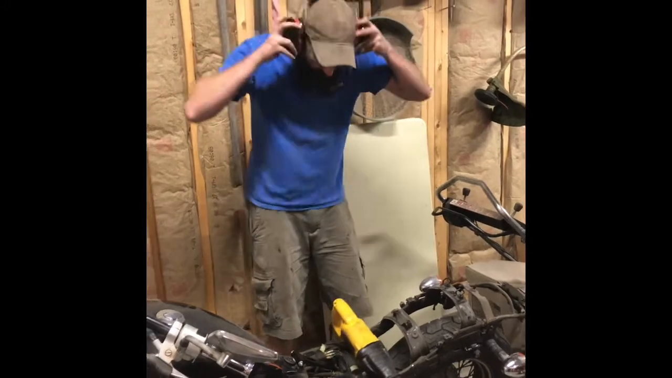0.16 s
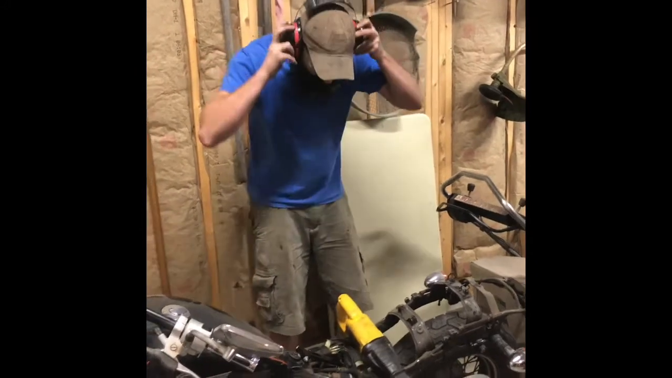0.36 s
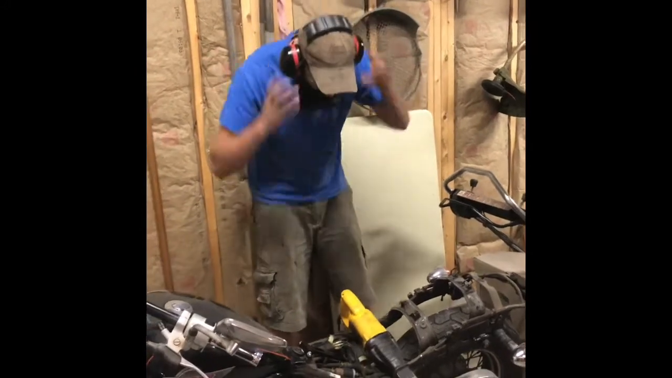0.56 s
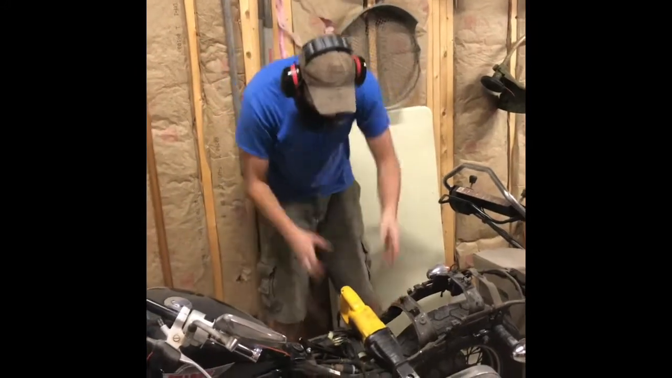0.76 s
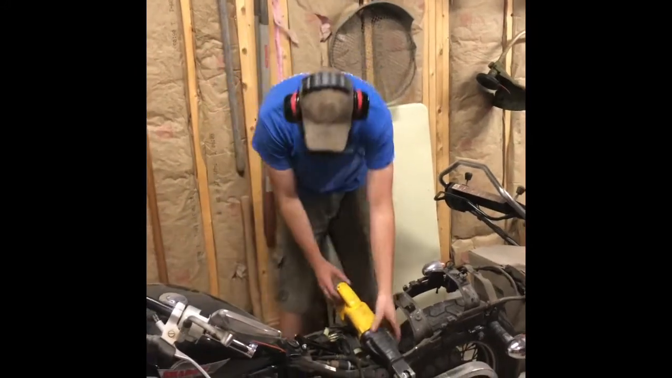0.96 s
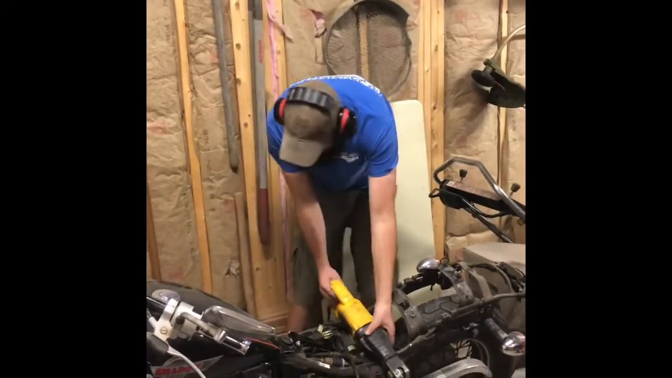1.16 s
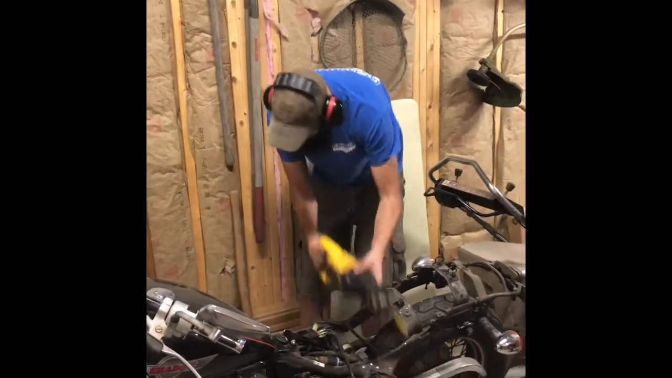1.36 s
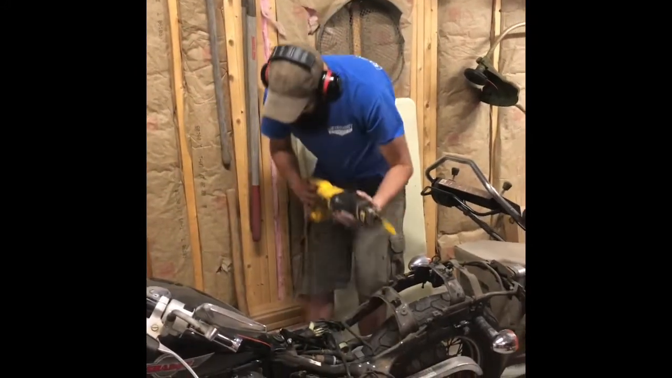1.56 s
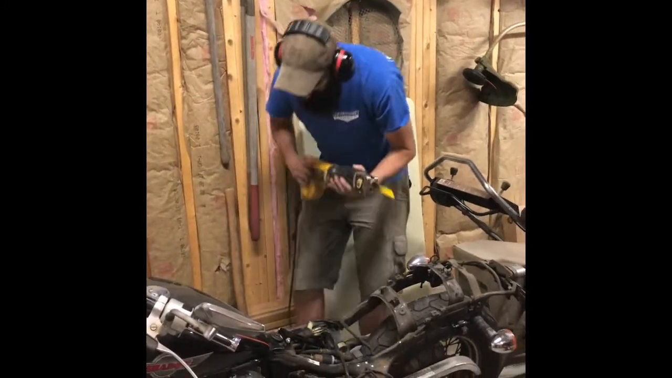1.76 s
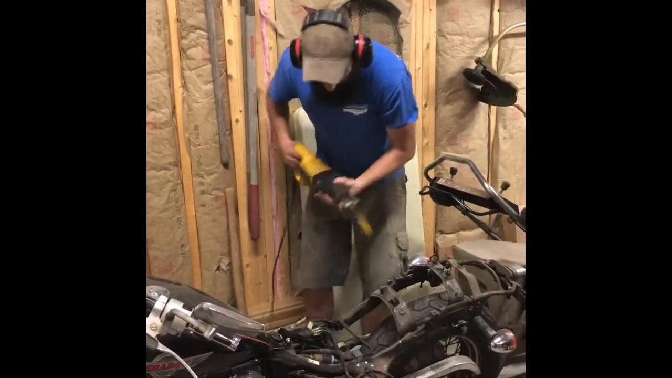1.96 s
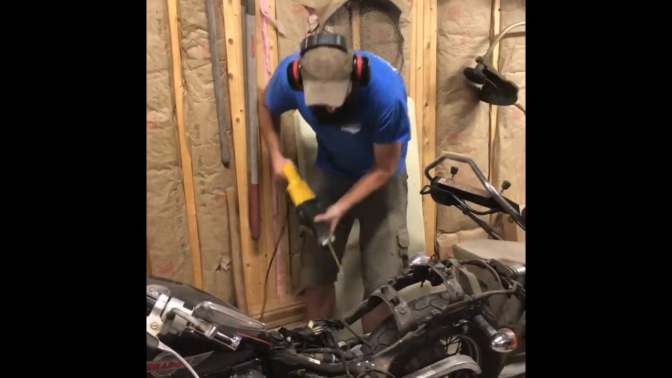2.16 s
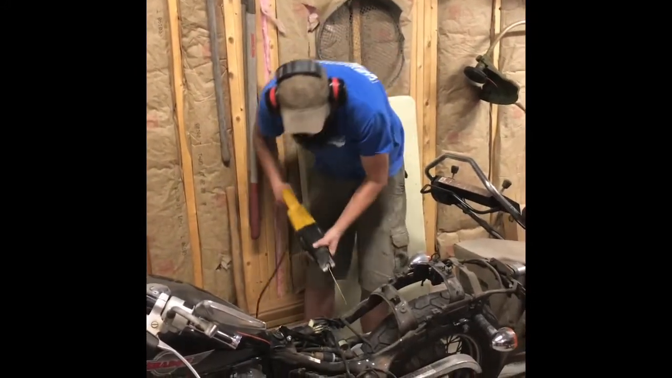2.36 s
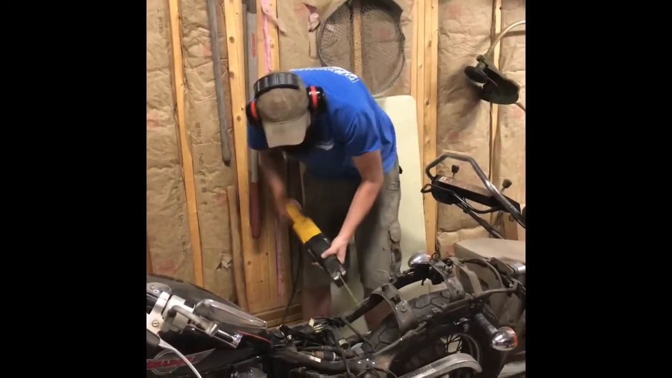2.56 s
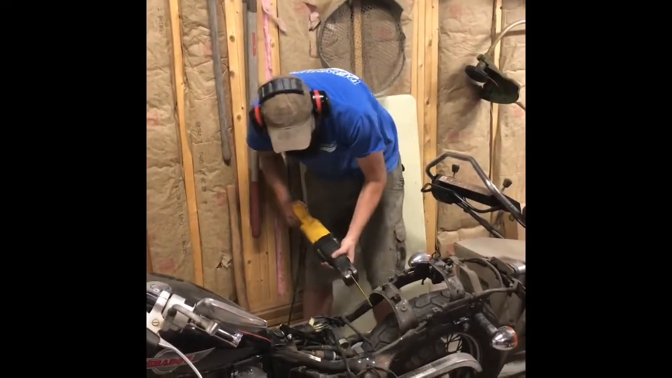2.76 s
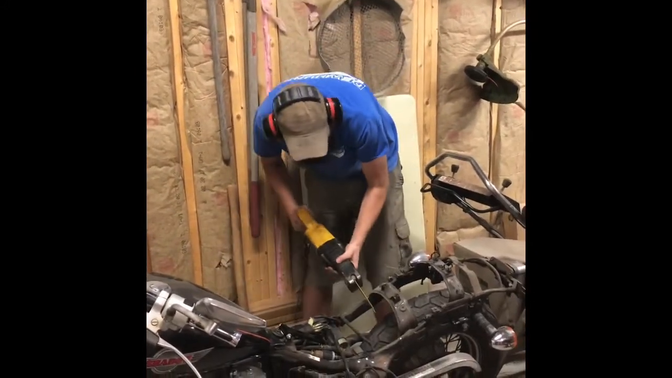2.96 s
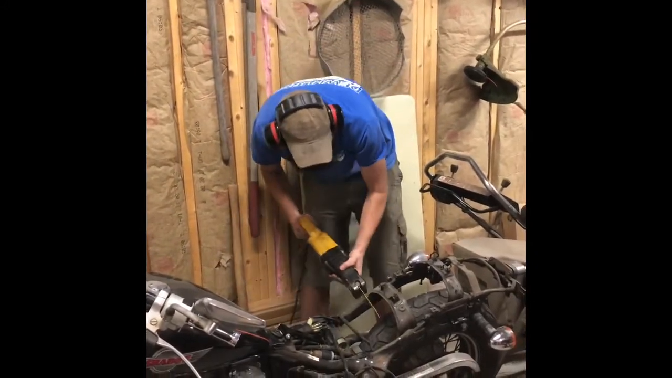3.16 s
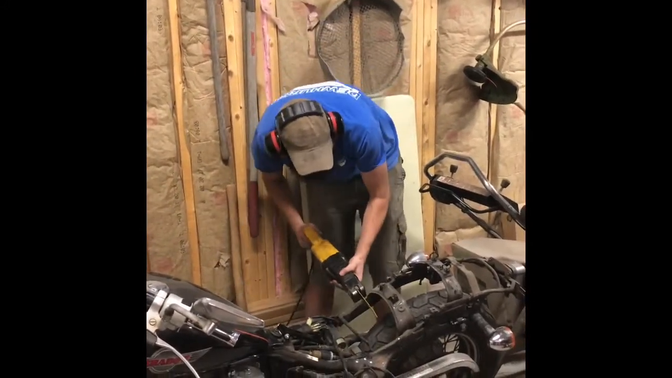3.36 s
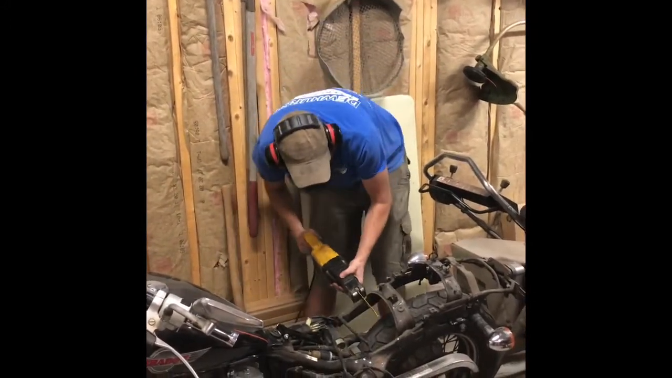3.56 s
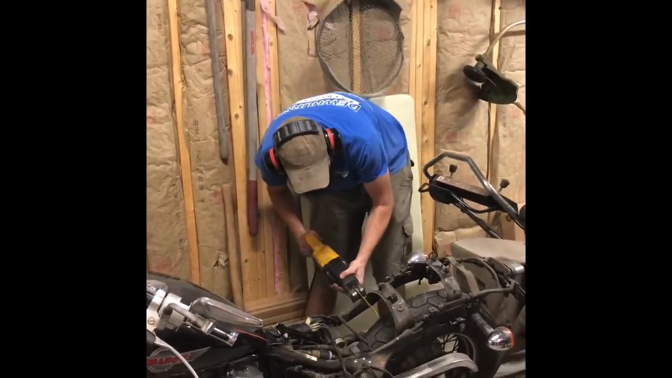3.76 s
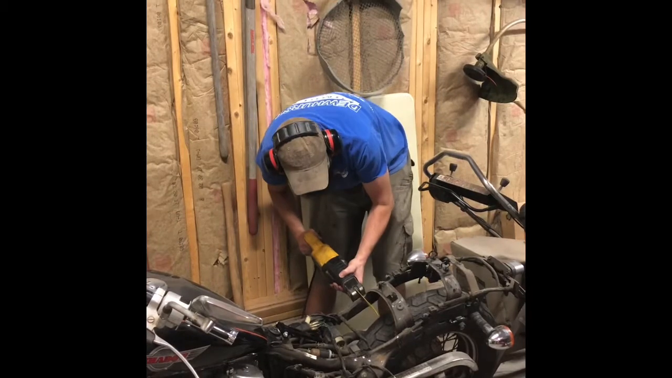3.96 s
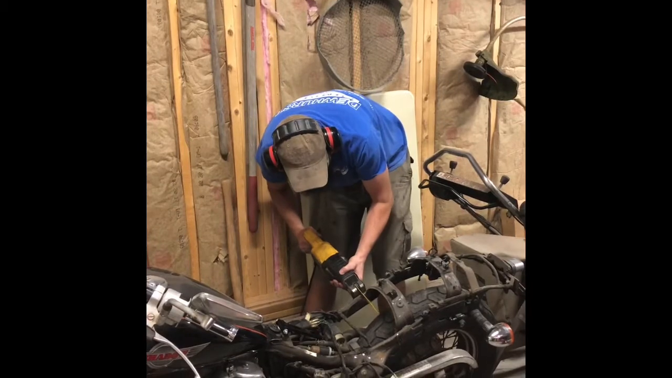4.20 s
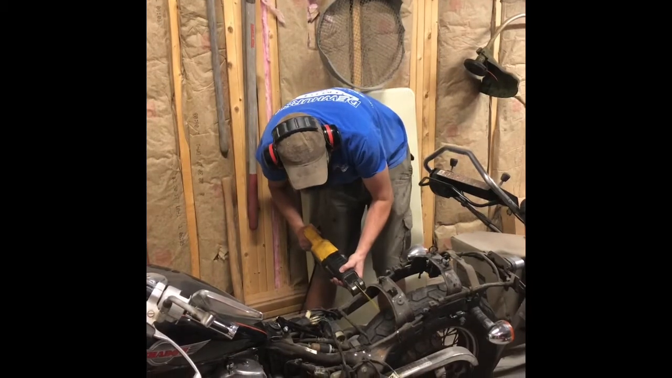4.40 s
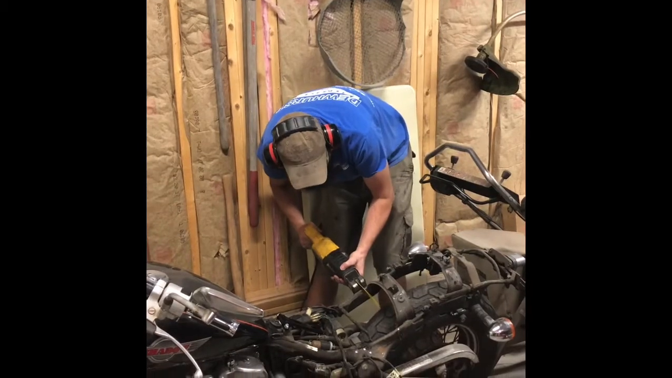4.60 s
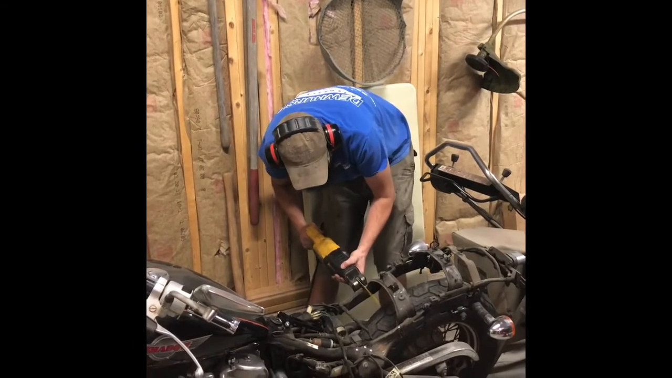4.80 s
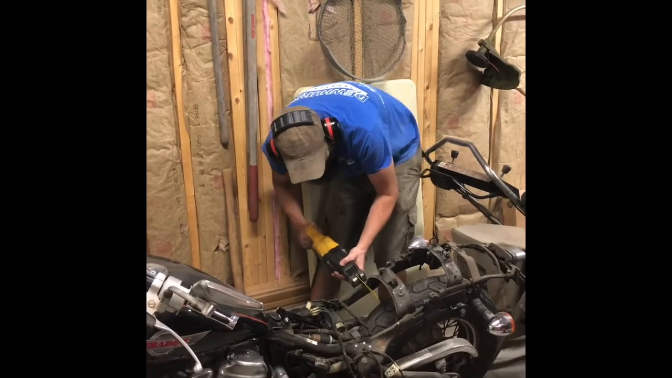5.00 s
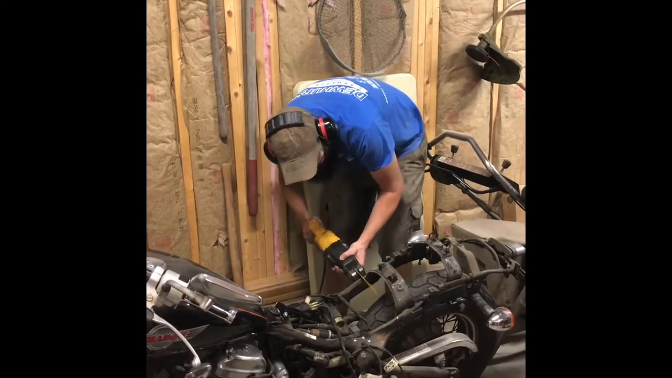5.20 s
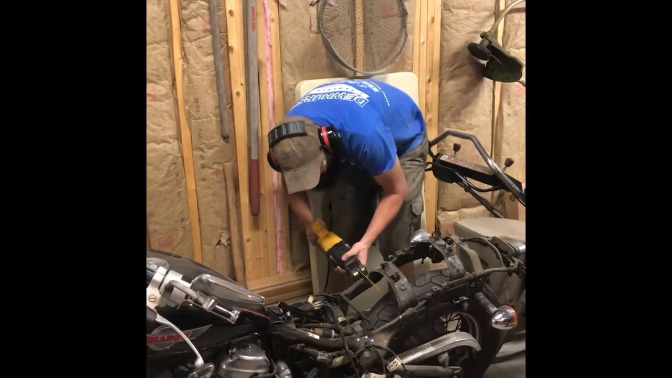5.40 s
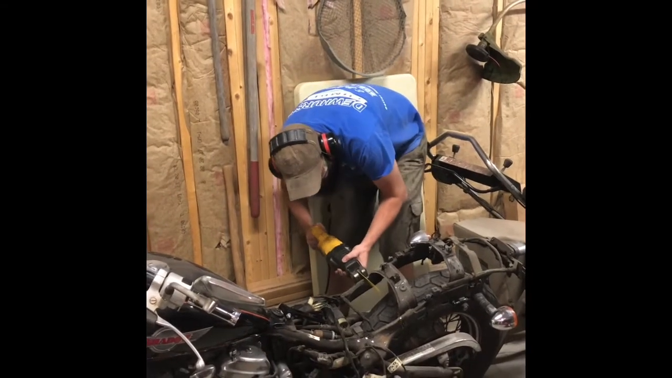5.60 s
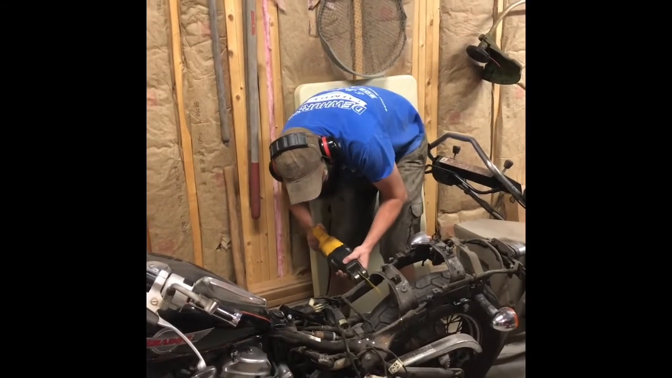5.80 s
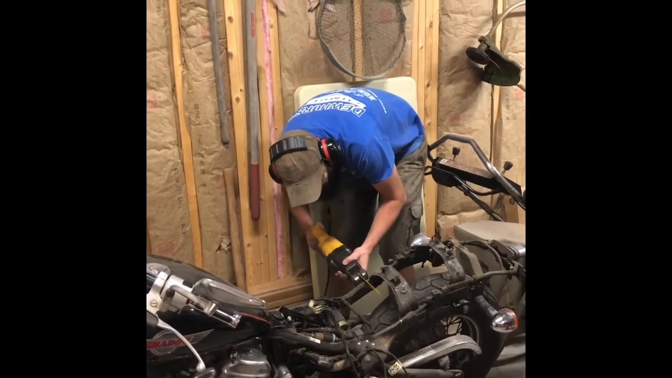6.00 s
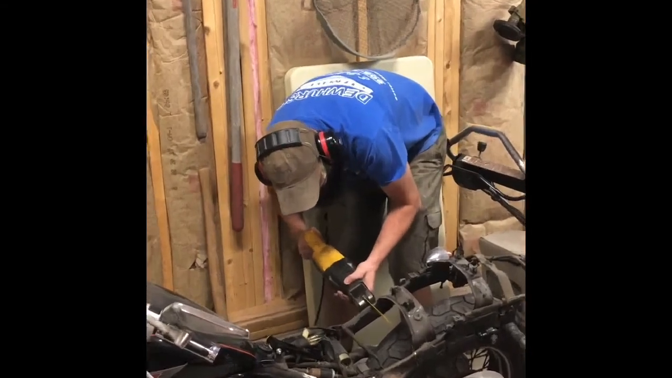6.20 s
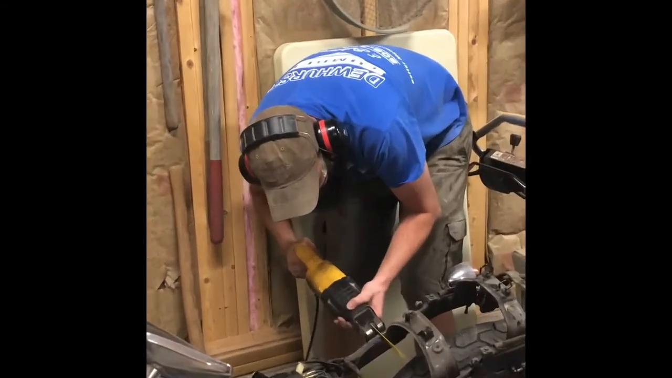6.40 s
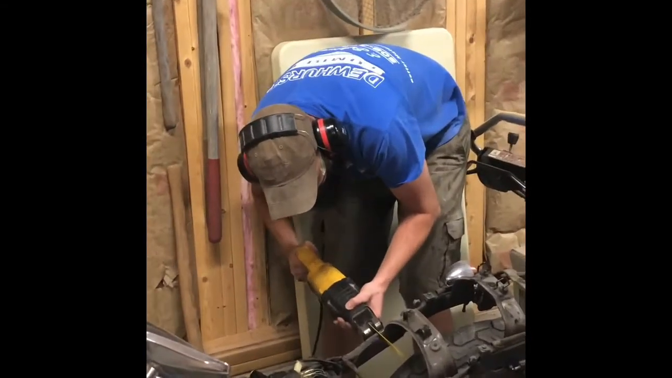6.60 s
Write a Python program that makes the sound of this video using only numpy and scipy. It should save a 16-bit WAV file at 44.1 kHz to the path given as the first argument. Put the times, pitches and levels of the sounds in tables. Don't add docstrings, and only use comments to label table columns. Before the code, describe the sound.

Soft rubs, a short metallic scrape and small knocks in a quiet workshop, then a reciprocating saw winds up and grinds loudly through steel.

```python
import sys
import numpy as np
from scipy import signal
from scipy.fft import rfft, irfft, next_fast_len
from scipy.io import wavfile
from scipy.ndimage import uniform_filter1d, minimum_filter1d

SR = 44100
rng = np.random.default_rng(int(sys.argv[2]) if len(sys.argv) > 2 else 0)


def wrap_up_sound(samples):
    columns = np.atleast_2d(samples).T
    tamed = np.clip(columns, -1, 1)
    steps = np.round(tamed * 32767).astype(np.int16)
    wavfile.write(sys.argv[1], SR, steps)


def volts_from_decibels(level):
    exponent = np.asarray(level, float) / 20
    return 10 ** exponent


N = 293265
T = np.arange(N) / SR

# (frequency [Hz], level [dB])
SMALL_PARTS = [(60, -68), (250, -18), (520, -8.5), (600, -1), (16000, 0)]


def saw():
    # (time [s], rate [strokes/s])
    crank_speed = [(3.74, 8.35), (3.8, 9.38), (3.93, 12.63), (4.04, 14.35), (4.27, 16.24), (4.39, 20.7),
                   (4.48, 25.98), (4.6, 29.76), (4.7, 30.8), (4.88, 31.04), (5.2, 32.31), (5.38, 32.15),
                   (5.85, 30.17), (6.35, 28.98), (6.47, 29.22), (6.65, 30.21)]
    # (time [s], cutting level [dB])
    cutting = [
        (3.74, -37),
        (3.76, -37.5),
        (3.82, -20.5),
        (4.31, -14),
        (5.05, -16.5),
        (6.13, -11),
        (6.65, -13.5),
    ]
    # (time [s], blade pressure [0-1], forward lean [0-1.5])
    hands = [(3.76, 0.4, 0.1), (4.1, 0.95, 0), (4.4, 0.4, 0.25), (4.55, 0.5, 0.1), (4.75, 0.6, 0.3),
             (5., 0.8, 0), (5.25, 0.78, 1.05), (5.5, 0.86, 0.5), (5.62, 0.77, 0.3), (5.75, 0.54, 0.9),
             (5.9, 0.8, 0.8), (6.1, 0.97, 1), (6.35, 0.87, 0.23), (6.65, 0.84, 0.2)]
    # times [s], then stages [0 winding up, 1 free, 2 loaded, 3 buried]
    stages = ([4.5, 4.65, 4.97, 5.08, 5.55, 5.75], [0, 1, 1, 2, 2, 3])
    # (frequency [Hz], level [dB])
    start_colour = [(2500, -6), (5000, -5), (15000, -4)]

    speed, cut_db = curves(crank_speed)[0], curves(cutting)[0]
    pressure, lean = curves(hands)
    turns = np.cumsum(speed * (T > crank_speed[0][0])) / SR
    stage = np.interp(T, *stages)
    fast = np.clip((speed - 18) / 11, 0, 1)
    deep = np.clip((T - 5.2) / 1.85, 0, 1)
    buried = step(T, 5.68, 0.36)
    kick = np.exp(-np.maximum(T - hands[0][0], 0) / 0.11)

    depth = 0.93 + 0.66 * np.exp(-((speed - 12.55) / 1.67) ** 2) + buried
    blade_turns = turns - 0.235 + 0.07 * step(T, 5.68, 0.1)
    hard = evened(stroke_throb(blade_turns, depth, lean) ** 2.6)
    bites = stroke_throb(blade_turns, depth, 0.18 * lean) ** 0.5
    bites = bites * evened(same_teeth(turns, 0.35 * fast) + 0.38 * grit(per_s=6000, spread_db=3.0))
    chatter = hard * evened(same_teeth(turns, 0.7 * fast) + 0.5 * grit(per_s=1200, spread_db=2.0))

    mix = rasp(bites, speed, deep)
    mix = mix + frame(chatter, pressure)
    mix = mix + housing(evened(bites + 0.26 * chatter), speed, kick, lean)
    mix = mix + blade(chatter, fast * pressure)
    mix = mix + hard ** (1.5 - 0.9 * fast) * gear_whine(speed, turns, fast, kick, buried)
    mix = mix + gearbox_growl(chatter, speed, fast, kick, lean)
    under_way = step(T, 3.8, 0.02)
    mix = under_way * mix + (1 - under_way) * volts_from_decibels(8.0) * colour(mix, start_colour)
    onset = np.clip((T - cutting[0][0]) / 0.021, 0, 1)
    return volts_from_decibels(cut_db - 2.5) * np.array([mix, crank_orders(speed, turns, stage, deep)]) * onset


def stroke_throb(turns, depth, lean):
    forward_bite = (.3, .06, 1.1)
    place, width, height = forward_bite
    slip = turns + 0.012 * wander(hz=10)
    half = (2 * (slip - 0.1)) % 1
    stroke = np.sin(np.pi * half ** 0.7) ** 0.8
    after = (slip - place + 0.5) % 1 - 0.5
    bite = height * np.exp(-(after / np.where(after < 0, width / 2, width)) ** 2)
    uneven = volts_from_decibels(0.9 * wander(hz=60))
    throb = 1 + np.clip(depth, 0, 3) * (stroke * uneven + np.clip(lean, 0, 2) * bite)
    return throb / np.sqrt(uniform_filter1d(throb ** 2, size=SR // 5))


def same_teeth(turns, share):
    size, memory = 1400, 0.8
    fresh = rng.standard_normal((100, size))
    worn = signal.lfilter([np.sqrt(1 - memory ** 2)], [1, -memory], fresh, axis=0)
    again = worn[turns.astype(int) + 5, (turns % 1 * size).astype(int)]
    return np.sqrt(share) * again + np.sqrt(1 - share) * rng.standard_normal(N)


def rasp(bites, speed, deep):
    # (frequency [Hz], level [dB per Hz])
    slow_cut = [(53, -54), (90, -17), (218, -33), (302, -25), (455, -18), (685, -14), (832, -11),
                (907, -4.5), (1200, -5), (1630, -3.5), (1890, -3.5), (2610, -4), (15700, -16.5)]
    # (frequency [Hz], level [dB per Hz])
    fast_cut = [(35, -71), (70, -32), (221, -29), (488, -24.5), (616, -16), (815, -18.5), (2740, 1),
                (3790, -1.5), (5010, -1.5), (5770, -1.5), (10600, -5.5), (15700, -10.5)]
    # (frequency [Hz], level [dB per Hz])
    deep_cut = [(35, -70), (60, -61), (232, -18), (425, -45), (602, -17), (796, -30), (1360, -5),
                (1490, -10.5), (1600, -10), (2170, -7.5), (3150, 1.5), (3540, -9), (11900, -6),
                (15700, -14.5)]
    spun = step(speed, 21.8, 3.5)
    full = (1 - deep) * colour(bites, fast_cut) + deep * colour(bites, deep_cut)
    return (1 - spun) * colour(bites, slow_cut) + spun * full


def frame(chatter, pressure):
    # (frequency [Hz], width [Hz], level [dB])
    frame_modes = [(1390, 30, -1), (1883, 49, -2.5), (2275, 140, 5.5), (2764, 81, 3.5), (3025, 140, 11.5),
                   (3240, 160, 2), (3720, 140, 0), (4300, 59, 3.5), (4770, 42, 1), (4970, 150, -16),
                   (6540, 97, -1), (8590, 140, 1.5), (10360, 33, -2), (11300, 140, 1)]
    return volts_from_decibels(-30 + 27 * pressure) * rings(chatter, frame_modes, drift_db=2.1)


def housing(drive, speed, kick, lean):
    # (frequency [Hz], width [Hz], level [dB])
    housing_modes = [(323, 34, 7.5), (531, 17, -6.5), (686, 7.3, -2.5), (894, 72, -2.5), (1210, 30, -10),
                     (1370, 84, -1.5), (1596, 150, 2), (2557, 45, 5)]
    level_db = -11 + 27 * kick + (-20 - 39 * lean) * step(speed, 18.3, 2.6)
    return volts_from_decibels(level_db) * rings(drive, housing_modes, drift_db=7.0)


def blade(chatter, strength):
    # (frequency [Hz], width [Hz], level [dB])
    blade_modes = [(4320, 38, -2), (4570, 130, -2), (4920, 100, -2), (5240, 43, -1), (6700, 110, -5),
                   (7230, 110, 1), (8520, 150, -4), (9770, 130, -11), (10530, 50, 2), (11100, 33, -4),
                   (11900, 240, 2), (12400, 140, -5), (13200, 160, -5), (14400, 55, 0)]
    return volts_from_decibels(-10.5) * strength * rings(chatter, blade_modes, drift_db=4.0)


def gear_whine(speed, turns, fast, kick, buried):
    # (multiple of stroke rate [1], slow [dB], full speed [dB], added in the rush [dB], blur [0-1])
    mesh = [(91.5, -8, -6, 3, .6), (110.5, 7, 1, -7, .55), (162, -2, -5, 1, .7), (221.3, 5.5, 0, -4, .9),
            (331.5, -7, -5, 0, 1.0), (420, -16, -13, 2, 1.2), (442, -16, -11, 2, 1.2)]
    # (frequency [Hz], width [Hz], level against the whine [dB])
    gearcase = (5130, 170, -5)
    gain_per_s2 = uniform_filter1d(np.gradient(speed) * SR, size=2000)
    rush = step(gain_per_s2, 22, 10) * step(T, 4.37, 0.02)
    whine = 0
    for multiple, slow_db, fast_db, rush_db, blur in mesh:
        wobble = blur * 2.0 * wander(hz=110)
        tone_db = slow_db + fast * (fast_db - slow_db) + rush * rush_db + wander(hz=15)
        whine = whine + volts_from_decibels(tone_db) * np.sin(2 * np.pi * multiple * turns + wobble)
    case_hz, case_width_hz, case_db = gearcase
    whine = whine + fast ** 2 * volts_from_decibels(case_db) * resonate(rng.standard_normal(N), case_hz, case_width_hz)

    level_db = -11 + 4.5 * fast - 13 * buried
    level_db = level_db - 5 * np.exp(-((T - 4.2) / 0.06) ** 2)
    level_db = level_db - 2.5 * kick
    level_db = level_db - 8 * (1 - step(T, 3.865, 0.02))
    return volts_from_decibels(level_db) * whine


def gearbox_growl(chatter, speed, fast, kick, lean):
    # (multiple of stroke rate [1], width [multiples], level [dB])
    bands = [(22.3, 3, 5), (37.3, 2, -13), (43.7, 3, -1), (60.7, 4, 21.5), (94.5, 5, 7)]
    growl = sum(volts_from_decibels(db) * resonate(chatter, k * speed, width * 28) for k, width, db in bands)
    return volts_from_decibels(-25.5 + 28 * kick + 5.5 * fast + 7.5 * lean) * colour(growl, SMALL_PARTS)


def crank_orders(speed, turns, stage, deep):
    # (multiple of stroke rate [1], winding up [dB], free [dB], loaded [dB], buried [dB])
    orders = [(3, -55, -44, -44, -43), (5, -60, -43, -44, -52), (4, -46, -44, -46, -46),
              (6, -36, -30, -44, -34), (7, -39, -42, -36, -46), (8, -43, -36, -50, -38),
              (10, -48, -42, -48, -48), (12, -37, -36, -42, -45), (14, -44, -37, -43, -43),
              (16, -52, -42, -50, -45), (18, -38, -46, -32, -48), (19, -29, -32, -27, -48),
              (20, -28, -17, -24, -26), (21, -45, -40, -38, -31), (22, -31, -30, -29, -35),
              (23, -46, -40, -44, -33), (24, -48, -38, -29, -31), (25, -52, -48, -44, -36),
              (26, -36, -40, -37, -37), (27, -43, -46, -35, -42), (28, -50, -40, -46, -39),
              (29, -38, -46, -36, -33), (30, -32, -34, -34, -41), (32, -29, -35, -37, -32),
              (34, -45, -39, -34, -36), (35, -38, -44, -31, -35), (36, -27, -24, -33, -35),
              (38, -35, -32, -35, -32), (39, -44, -39, -40, -28), (40, -37, -34, -30, -30),
              (42, -42, -33, -29, -29), (43, -33, -32, -27, -31), (44, -34, -38, -22, -31),
              (46, -40, -36, -38, -23), (47, -38, -40, -30, -22)]
    hum = 0
    for multiple, *stage_db in orders:
        order_db = np.interp(stage, np.arange(len(stage_db)), stage_db) + wander(hz=12.0)
        hum = hum + volts_from_decibels(order_db) * np.sin(2 * np.pi * (multiple * turns + rng.random()))
    level_db = -19 * (1 - step(speed, 13.8, 1.6)) - 1.5 * deep
    surge_db = 1.5 * np.clip(1 - stage, 0, 1)
    return volts_from_decibels(level_db + surge_db) * hum


def slide():
    # (start [s], level [dB], rise [s], hold [s], gain while held [dB], fall [dB/s])
    drag = (1.185, -43, 0.05, 0.21, 3, 420)
    # (frequency [Hz], width [Hz], level [dB], gain along the slide [dB])
    body_modes = [(657, 40, -16, 1), (1130, 26, 2, -4), (1360, 25, -4, -2), (1620, 30, -9, -3),
                  (1900, 66, 3, -5), (2280, 52, -7, -5), (3100, 80, -6, -9), (3740, 150, 3, -8),
                  (4600, 230, 6, -1), (5300, 240, -1, -5)]
    # (frequency [Hz], level [dB per Hz])
    friction = [(88, -47), (150, -19), (204, -29), (382, -6.5), (506, -24), (637, -2), (856, -11),
                (1120, 0), (3200, -13), (4160, -35), (7040, -120)]
    start, db, rise, hold, gained_db, fall = drag
    slips = evened(rng.standard_normal(N) + 0.43 * grit(per_s=1900, spread_db=5.0))
    held = np.clip((T - start - rise) / hold, 0, 1)
    glide = 1 + 0.055 * (held - 0.5)
    modes = [(hz * glide, width, mode_db + gain_db * (2 * held - 1))
             for hz, width, mode_db, gain_db in body_modes]
    body = colour(slips, friction) + volts_from_decibels(-1) * rings(slips, modes, drift_db=2.2)
    return volts_from_decibels(db - 5.5 + gained_db * held) * swell(start, rise, hold, 20, fall) * body


def knocks():
    # (time [s], peak [dB], frequency [Hz], T60 [s], puff share [0-1])
    thumps = [
        (1.945, -47, 150, 0.093, 0.98),
        (1.963, -40.5, 283, 0.079, 0.94),
        (1.989, -37.5, 103, 0.12, 0.62),
        (2.029, -43, 91.5, 0.13, 0.31),
        (2.07, -42, 88.8, 0.13, 0.4),
        (2.267, -35.5, 244, 0.084, 0.94),
        (2.288, -23, 108, 0.11, 0.22),
        (2.318, -35, 120, 0.072, .6),
        (2.339, -30, 97, 0.064, 0.35),
        (3.566, -45, 317, 0.14, 0.64),
    ]
    # (time [s], peak [dB], frequency [Hz], ring share [0-1], T60 [s])
    ticks = [(0.598, -62, 1090, 0.25, 0.12), (0.717, -43, 1940, 0.37, 0.12), (1.612, -51, 1130, 0.25, 0.12),
             (1.837, -40, 1310, 0.23, 0.11), (2.139, -46, 2570, 0.36, 0.43), (2.268, -37, 770, 0.69, 0.06),
             (2.282, -32, 800, 0.96, 0.041), (2.279, -38, 1620, 0.42, 0.076),
             (3.014, -45, 1080, 0.25, 0.12), (3.109, -43, 990, 0.28, 0.11), (3.142, -44, 1050, 0.25, 0.11),
             (3.228, -36, 1360, 0.2, 0.099), (3.235, -38, 1170, 0.25, 0.12), (3.377, -37, 1334, 0.6, 0.047),
             (3.441, -44, 1080, 0.25, 0.12), (3.572, -37, 1095, 0.27, 0.099),
             (3.677, -22.5, 1600, 0.17, 0.052)]
    out, t = np.zeros(N), T[:SR // 3]
    for s, db, hz, t60, share in thumps:
        puff = share * resonate(resonate(rng.standard_normal(len(t)), 200, 340), 240, 500) / 6
        thump = np.sin(2 * np.pi * hz * t) + puff
        add(out, s, volts_from_decibels(db - 60 * t / t60) * thump * np.clip(t / 0.011, 0, 1))
    for s, db, hz, share, t60 in ticks:
        hiss = 0.073 * signal.lfilter([0.9], [1, -0.15], rng.standard_normal(len(t)))
        tick = hiss + share * np.sin(2 * np.pi * hz * t)
        add(out, s, volts_from_decibels(db - 60 * t / t60) * tick * np.clip(t / 0.0012, 0, 1))
    return out


def rustle():
    # (start [s], level [dB], rise [s], hold [s], dull part [dB])
    brushes = [(0.708, -53.5, 0.0046, .012, 4), (0.914, -66, .012, 0.15, -5),
               (1.042, -56.5, 0.043, 0.16, 4), (1.135, -45.5, 0.049, 0.13, 0),
               (1.297, -43, 0.058, 0.059, -4), (1.473, -59, .01, 0.07, -10), (1.688, -65, .02, .02, 10),
               (1.822, -61, .01, .03, -5), (1.867, -54, .012, 0.058, 4), (1.958, -60.5, .02, 0.13, -5),
               (2.127, -54, .006, 0.036, 6), (2.215, -57, .035, 0.04, 13), (2.386, -59, .1, 0.025, 4),
               (2.57, -52, 0.015, 0.038, -10), (2.782, -55.5, 0.018, 0.059, 7.5), (3.1, -60, .03, .02, 10),
               (3.224, -49, .002, 0.017, 3), (3.31, -57.5, 0.064, .02, 12), (3.443, -55, .004, 0.068, 0),
               (3.568, -60.5, .005, 0.013, 10), (3.674, -44, 0.00088, 0.019, 7.5)]
    # (frequency [Hz], level [dB per Hz])
    cloth = [(1180, -17), (2000, -5.5), (2380, -11), (2870, -2.5), (5730, -2), (8010, -14), (10700, -10.5),
             (15700, -20)]
    crackle = evened(rng.standard_normal(N) + 0.5 * grit(per_s=1900, spread_db=2.5))
    low = colour(crackle, [(250, -26), (450, 8.5), (1200, 7.5), (2500, 2), (3500, -69)])
    fine, dull = volts_from_decibels(-71.5), volts_from_decibels(-67)
    for start, db, rise, hold, dull_db in brushes:
        brush = volts_from_decibels(db) * swell(start, rise, hold, 12, 236)
        fine = np.hypot(fine, brush)
        dull = np.hypot(dull, volts_from_decibels(dull_db - 9.0) * brush)
    return fine * colour(crackle, cloth) + dull * low


def ear_muffs():
    # (start [s], level [dB], rise [s], hold [s])
    rubs = [
        (0.0, -58.5, 0.072, 0.18),
        (0.202, -69, .03, .04),
        (0.318, -57.5, .015, 0.054),
        (.44, -64, .003, 0.01),
        (.92, -64, .01, .2),
        (2.3, -67, .03, .1),
        (2.69, -66, .03, .05),
    ]
    # (frequency [Hz], level [dB per Hz])
    padding = [(1470, -21), (2500, -2.5), (2760, -6), (3790, -8), (4060, -7), (5520, -9.5), (15700, -13)]
    noise = rng.standard_normal(N) + 0.4 * grit(per_s=1600, spread_db=4.0)
    level = sum(volts_from_decibels(db) * swell(start, rise, hold, 12, 236) for start, db, rise, hold in rubs)
    return level * colour(noise, [(1500, -30)] + padding)


def walls(x):
    # (frequency [Hz], T60 [s])
    decay = [(100, 0.31), (1000, 0.23), (4000, 0.15), (15000, 0.31)]
    noise = rng.standard_normal(SR // 2) * (T[:SR // 2] > 0.005)
    hz, t, z = signal.stft(noise, SR, nperseg=256)
    t60 = np.interp(hz, *np.transpose(decay))[:, None]
    tail = signal.istft(z * volts_from_decibels(-60 * t / t60), SR, nperseg=256)[1]
    return signal.fftconvolve(x, tail / np.linalg.norm(tail))[:N]


def room_tone():
    # (frequency [Hz], level [dB per Hz])
    air_colour = [(15, -34), (25, -26), (70, -6.5), (179, -4), (254, -2), (324, -7), (602, -4.5),
                  (767, -7.5), (1090, -4), (1500, -10.5), (2020, -11), (6200, -26), (7200, -29),
                  (15700, -33)]
    # (frequency [Hz], level [dB])
    machine_tones = [(60, -61.5), (120, -68), (250, -66.5), (900, -68.5), (1060, -76), (1140, -69.5)]
    air = colour(rng.standard_normal(N), air_colour) * volts_from_decibels(-56.5 + 0.47 * wander(hz=12))
    return air + sum(volts_from_decibels(db) * resonate(rng.standard_normal(N), hz, 15.0) for hz, db in machine_tones)


def rings(drive, modes, drift_db):
    total = sum(volts_from_decibels(db + drift_db * wander(hz=9.6)) * resonate(drive, hz, width) for hz, width, db in modes)
    return colour(total, SMALL_PARTS)


def resonate(x, hz, width_hz):
    turn = np.exp(2j * np.pi * np.cumsum(hz * np.ones(len(x))) / SR)
    r = np.exp(-np.pi * width_hz / SR)
    return (turn * signal.lfilter([np.sqrt(2 - 2 * r * r)], [1, -r], x / turn + 1e-18)).real


def colour(x, points):
    hz, db = np.transpose(points)
    size = next_fast_len(len(x))
    f = np.fft.rfftfreq(size, 1 / SR)
    gain = volts_from_decibels(np.interp(np.log(f + 1), np.log(hz + 1), db))
    return evened(irfft(rfft(x, size) * gain, size)[:len(x)])


def grit(per_s, spread_db):
    sizes = volts_from_decibels(spread_db * np.minimum(rng.exponential(1, N), 5))
    clicks = sizes * (rng.random(N) < per_s / SR)
    return evened(clicks * rng.standard_normal(N))


def wander(hz):
    size = max(int(SR / hz), 1)
    return evened(uniform_filter1d(uniform_filter1d(rng.standard_normal(N), size), size))


def swell(start, rise, hold, rise_db, fall_db_per_s):
    up_db = rise_db * np.minimum((T - start) / max(rise, 1e-3) - 1, 0)
    down_db = fall_db_per_s * np.maximum(T - start - rise - hold, 0)
    return volts_from_decibels(up_db - down_db) * (T > start)


def step(x, at, spread):
    return 0.5 + 0.5 * np.tanh((x - at) / spread)


def curves(rows):
    s, *columns = np.transpose(rows)
    return [np.interp(T, s, c) for c in columns]


def evened(x):
    return x / np.sqrt(np.mean(x ** 2) + 1e-20)


def add(mix, s, sound):
    part = mix[round(s * SR):][:len(sound)]
    part += sound[:len(part)]


def scene():
    rattle, hum = saw()
    near = rattle + slide() + knocks()
    duck_db = np.interp(T, [3.8, 4.6], [0, -16])
    mono = volts_from_decibels(0.5) * near + hum + volts_from_decibels(-8.5) * walls(near)
    mono = mono + rustle() + volts_from_decibels(duck_db) * room_tone() + ear_muffs()
    return np.array([mono, mono])


def band_limit(x):
    return signal.sosfilt(signal.butter(12, 17020, fs=SR, output="sos"), x)


def record(dry):
    capsule = signal.lfilter(*signal.butter(2, 40, "high", fs=SR), dry)
    allowed = np.minimum(0.76 / (np.abs(capsule) + 1e-9), 1)
    held = capsule * uniform_filter1d(minimum_filter1d(allowed, size=221), size=221)
    edge = signal.firwin(1023, 15790, window=("kaiser", 10), fs=SR)
    return band_limit(signal.oaconvolve(held, edge[None], "same"))


dry = scene()
out = record(dry)
wrap_up_sound(out)
```